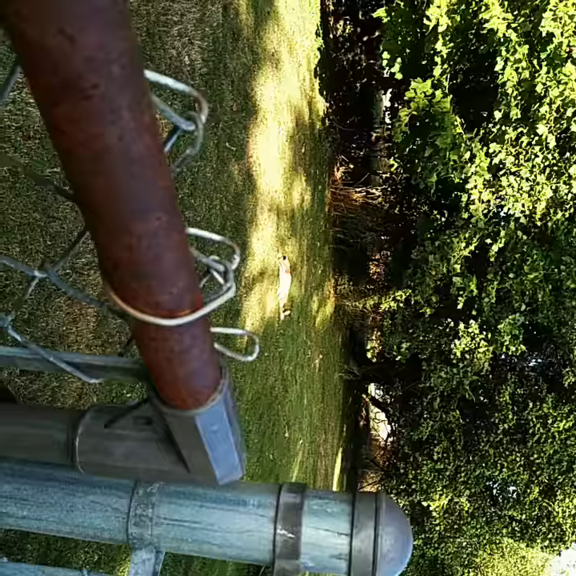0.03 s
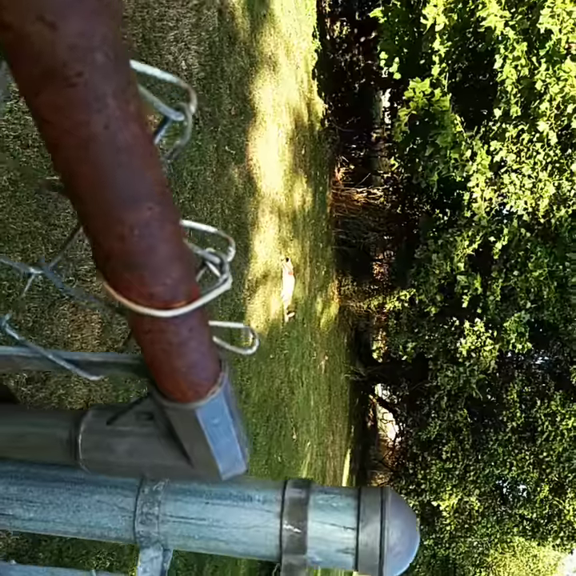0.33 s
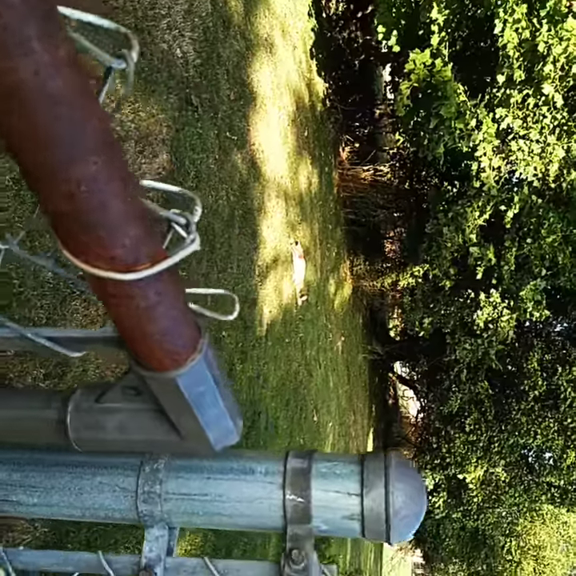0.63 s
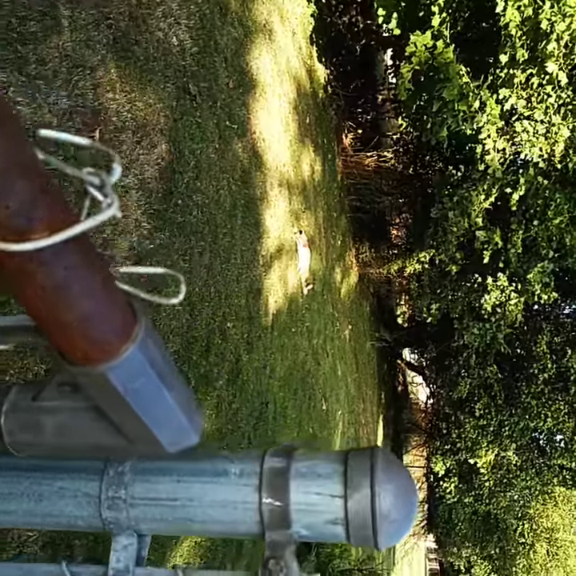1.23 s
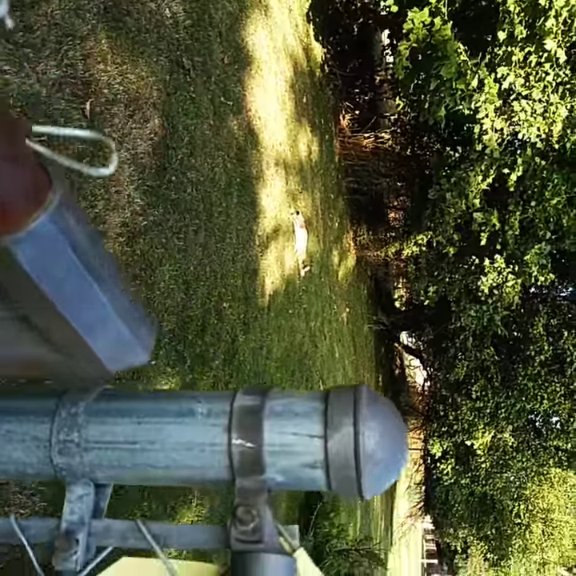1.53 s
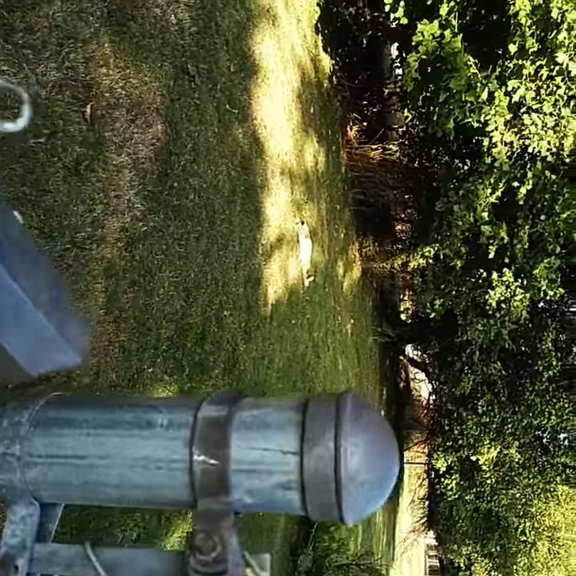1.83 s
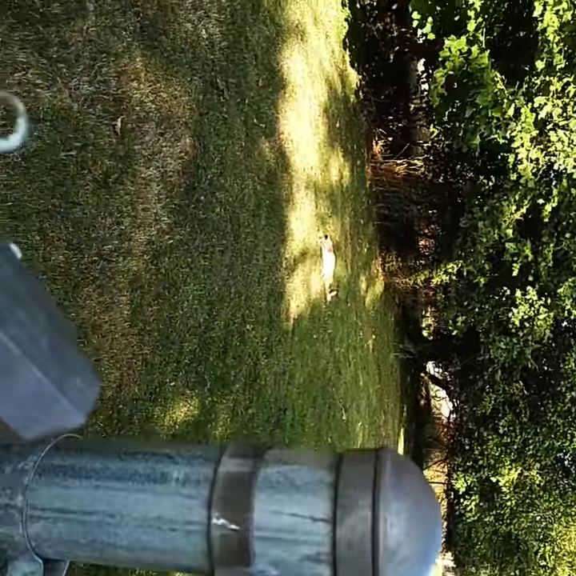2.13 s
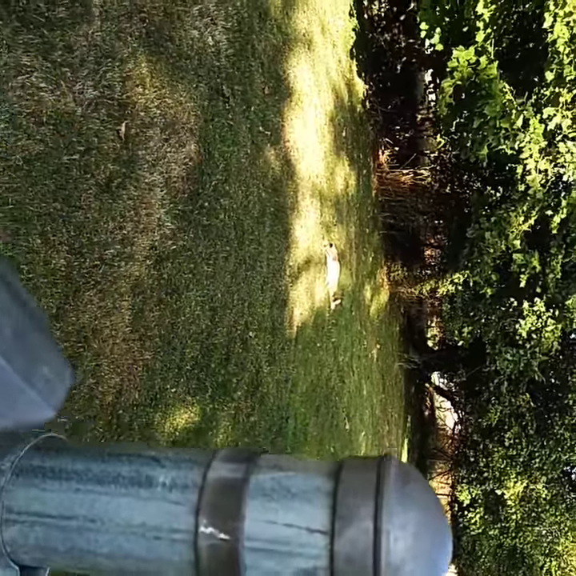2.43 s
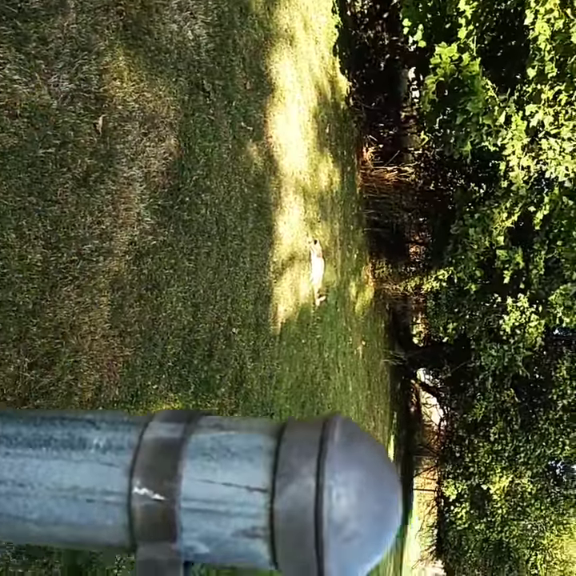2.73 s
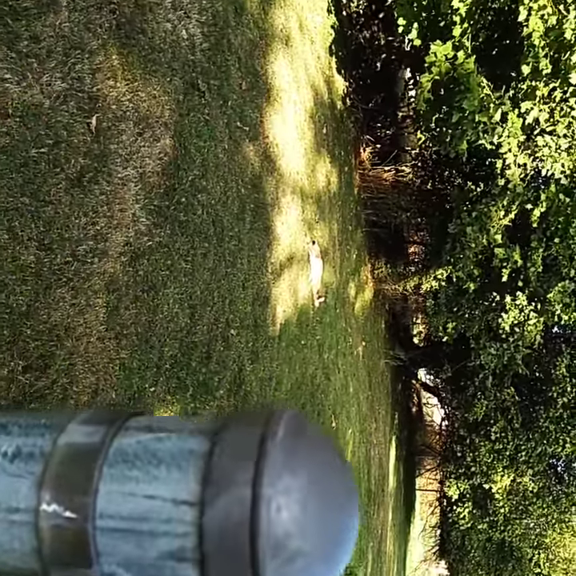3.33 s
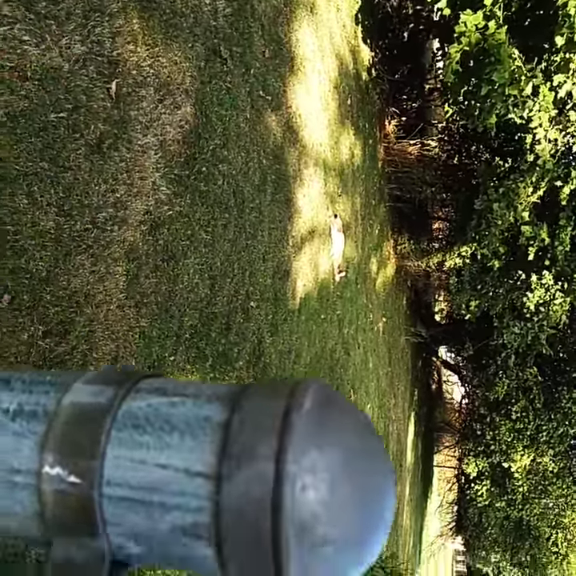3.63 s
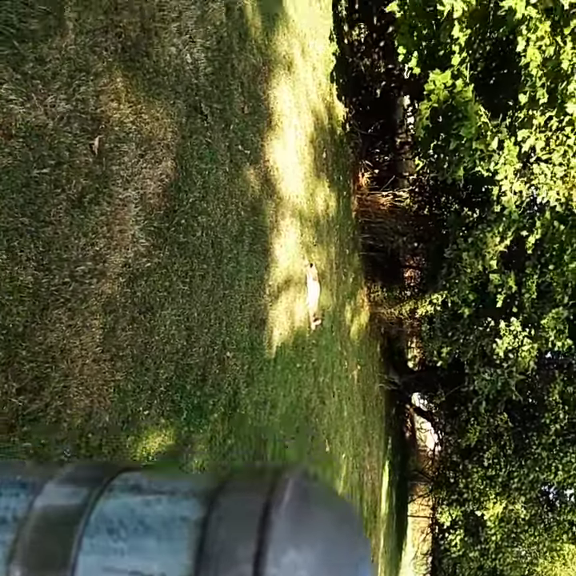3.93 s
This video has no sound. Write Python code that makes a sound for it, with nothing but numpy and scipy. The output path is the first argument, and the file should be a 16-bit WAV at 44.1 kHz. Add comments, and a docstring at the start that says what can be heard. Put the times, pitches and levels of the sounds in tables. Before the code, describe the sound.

Insects buzz and chirp steadily outdoors, with a few close knocks, snaps and rustles.

```python
"""Insects on a lawn beside trees

Bush crickets buzz in fast down-swept wing strokes and small crickets chirp over outdoor air
and a far chorus; a distant bird calls once. Handling knocks and bumps the hand-held microphone.
Dry snaps, ticks and a soft brushing come from close by. Mono."""
import sys
import numpy as np
from scipy import signal
from scipy.fft import rfft, irfft
from scipy.io import wavfile

SR = 44100
rng = np.random.default_rng(int(sys.argv[2]) if len(sys.argv) > 2 else 0)


def wrap_up_sound(samples):
    """Save the sound to the file named by the first command line argument, as 16-bit audio."""
    columns = np.atleast_2d(samples).T
    # keep every value between -1 and 1, then stretch to whole-number steps
    tamed = np.clip(columns, -1, 1)
    steps = np.round(tamed * 32767).astype(np.int16)
    wavfile.write(sys.argv[1], SR, steps)


N = 176400
TIME = np.arange(N) / SR


def from_db(db):
    """Decibels to gain."""
    return 10 ** (np.asarray(db) / 20)


def unit_rms(x):
    """Scale to unit power."""
    return x / np.sqrt(np.mean(x ** 2) + 1e-20)


def gain_curve(rows):
    """Gain along (s, dB) points."""
    return from_db(np.interp(TIME, *np.transpose(rows)))


def add(out, start_s, sound):
    """Mix a sound in at start_s."""
    i = int(np.clip(start_s * SR, 0, N))
    out[i:i + len(sound)] += sound[:N - i]


def wobble(hz):
    """Random movement up to about hz; rms 1."""
    lowpass = signal.butter(2, hz, fs=SR, output="sos")
    return unit_rms(signal.sosfilt(lowpass, rng.standard_normal(N + SR))[SR:])


def noise(spectrum, tilt_db=0):
    """Noise coloured by (Hz, dB) points and a tilt per octave; rms 1."""
    hz, db = np.transpose(spectrum)
    octave = np.log2(np.fft.rfftfreq(N, 1 / SR) + 1)
    low_cut_db = 20 * np.minimum(octave - np.log2(hz[0]), 0)
    colour_db = np.interp(octave, np.log2(hz), db + tilt_db * np.log2(hz)) + low_cut_db
    return unit_rms(irfft(rfft(rng.standard_normal(N)) * from_db(colour_db), N))


# Each row: frequency in Hz, relative density in dB.
AIR_SPECTRUM = [(25, -17), (50, 18.5), (80, 14), (130, 9.5), (200, 4.5), (350, 0.5), (700, -1), (1300, -4),
                (1750, -2.5), (2250, 1), (2800, -3.5), (3600, -5), (6200, -7), (7800, -7), (10500, -13.5),
                (16000, -15)]


def air():
    """Outdoor air and leaves: steady rumble and hiss."""
    return from_db(-42.5) * noise(AIR_SPECTRUM)


# Each row: pitch in Hz, width in Hz, level in dB, throbs per second.
CHORUS_BANDS = [(4650, 750, -54.5, 47), (5780, 80, -65, 27), (5600, 300, -65, 33), (7430, 450, -58.5, 57),
                (6850, 500, -62, 44), (8250, 700, -61.5, 70), (9300, 800, -63, 62), (11250, 400, -67, 52),
                (15400, 900, -62, 75)]


def far_chorus(throb_depth=.5):
    """Distant insects blur into throbbing bands, one for each kind."""
    out = np.zeros(N)
    for hz, width_hz, db, throb_hz in CHORUS_BANDS:
        phase = 2 * np.pi * hz * TIME
        band = wobble(width_hz / 2) * np.sin(phase) + wobble(width_hz / 2) * np.cos(phase)
        rate_hz = throb_hz * (1 + .0798 * wobble(7.8))
        throb = np.sin(2 * np.pi * np.cumsum(rate_hz) / SR)
        out += from_db(db) * unit_rms(band * (1 + throb_depth * throb))
    return out


def wing_stroke(length_s, hz, fall_hz):
    """A tone that swells, dies and falls as the scraper slows."""
    progress = np.linspace(0, 1, int(length_s * SR))
    cycles = np.cumsum(hz + fall_hz * (.5 - progress)) / SR + rng.random()
    return np.sin(np.pi * progress) * np.sin(2 * np.pi * cycles)


# Each row: start and end in seconds, strokes per second, stroke length in seconds, pitch in Hz,
# fall per stroke in Hz, relative level in dB.
TRILL_RUNS = [(.07, .62, 64.5, .011, 4830, 1000, -46.5), (.616, 1.6, 65.5, .011, 4900, 450, -48.5),
              (.641, .69, 59, .013, 4530, 300, -42), (.74, .9, 58.5, .012, 4540, 400, -46),
              (.928, 1.11, 58.8, .013, 4530, 400, -44), (1.148, 1.25, 59, .013, 4560, 400, -41.5),
              (1.268, 1.42, 60, .012, 4560, 400, -44.5), (1.44, 2.18, 58, .012, 4660, 850, -46.5),
              (2.2, 2.72, 50, .011, 4680, 1100, -46.5), (2.74, 3.17, 54, .013, 4900, 750, -47.5),
              (3.2, 4, 55.5, .012, 4680, 900, -49.5), (.1865, .53, 57, .012, 7400, 480, -40.5),
              (1.077, 1.175, 57, .011, 7480, 300, -45), (1.5, 2.2, 58, .011, 8550, 1100, -50.5),
              (2.2, 3, 52, .011, 8700, 1300, -50.5), (3.2, 4, 60, .012, 7800, 900, -54)]


def bush_crickets(jitter_s=.0004, spread_db=1.4, spread_hz=45, rasp_depth=.3):
    """Runs of quick, rasping wing strokes, each slightly different."""
    out = np.zeros(N)
    for start_s, end_s, rate_hz, length_s, hz, fall_hz, db in TRILL_RUNS:
        draws = rng.standard_normal((100, 3))
        for at_s, (late, strong, sharp) in zip(np.arange(start_s, end_s, 1 / rate_hz), draws):
            stroke = wing_stroke(length_s, hz + spread_hz * sharp, fall_hz)
            add(out, at_s + jitter_s * late, from_db(db + spread_db * strong) * stroke)
    return 1.52 * out * (1 + rasp_depth * wobble(520))


# Each row: delay in seconds, gain in dB.
ECHO_TAPS = [(.0045, -11), (0.024, -15), (.041, -18)]


def with_echoes(direct):
    """The direct sound plus reflections from ground and trees."""
    out = direct.copy()
    for delay_s, db in ECHO_TAPS:
        add(out, delay_s, from_db(db) * direct)
    return out


# Each row: start, period and chirp length in seconds, pitch in Hz, relative level in dB.
CRICKET_VOICES = [(.16, .0897, .038, 5612, -57), (.526, .2215, .044, 6062, -55.5),
                  (.4, .31, .05, 5785, -59)]


def crickets(spread_db=.75):
    """Pure one-stroke chirps, each insect keeping its own time."""
    out = np.zeros(N)
    for start_s, period_s, length_s, hz, db in CRICKET_VOICES:
        for at_s, weak in zip(np.arange(start_s, N / SR, period_s), rng.standard_normal(80)):
            add(out, at_s, from_db(db - spread_db * weak) * wing_stroke(length_s, hz, fall_hz=70))
    return 1.71 * out


# Each row: frequency in Hz, gain in dB, T60 in seconds.
HOUSING_MODES = [(72, 1, 0.054), (308, 6, 0.0064), (706, -0.5, 0.017), (1060, -6, 0.0085),
                 (2400, -5, 0.0045)]
# Each row: start in seconds, level in dB, gain of the lowest mode.
FINGER_KNOCKS = [(0.2471, -20, 0.82), (.2893, -28, .15)]


def knocks():
    """A finger knocks on the microphone housing, whose modes die quickly."""
    out, t = np.zeros(N), TIME[:SR // 10]
    for start_s, db, thud in FINGER_KNOCKS:
        for k, (hz, mode_db, t60_s) in enumerate(HOUSING_MODES):
            weight = (thud if k == 0 else 1) * (-1) ** (k + 1)
            envelope = from_db(db + mode_db - 60 * t / t60_s)
            add(out, start_s, weight * envelope * np.sin(2 * np.pi * hz * t))
    return out


def cracks(rows, spectrum, grain_db=1, tail_s=.06, tail_tilt_db=-1.5):
    """Grainy noise bursts with a short, duller outdoor tail."""
    out = np.zeros(N)
    for peak_s, db, attack_s, decay_s, tail_db, tilt_db in rows:
        before_s, after_s = np.maximum(peak_s - TIME, 0), np.maximum(TIME - peak_s, 0)
        grains = unit_rms(noise(spectrum, tilt_db) * from_db(-grain_db * wobble(1200)))
        burst = grains * np.exp(-after_s / decay_s)
        tail = from_db(tail_db) * noise(spectrum, tilt_db + tail_tilt_db) * np.exp(-after_s / tail_s)
        out += from_db(db) * np.exp(-before_s / attack_s) * (burst + tail)
    return out


# Each row: peak time in seconds, level in dB, attack and decay in seconds, tail gain in dB,
# tilt in dB per octave.
SNAP_EVENTS = [(.353, -36.5, 0.00061, 0.0028, -16, -2.5), (3.141, -36, .002, 0.0036, -14, -5),
               (3.177, -26, 0.0032, 0.011, -8, -2.7), (3.361, -41, .003, 0.006, -1.5, 3),
               (3.84, -38, 0.0012, 0.0049, -13, -8), (3.9543, -24.5, 0.000042, 0.0037, -17, -0.3)]
# Each row: frequency in Hz, relative density in dB.
SNAP_SPECTRUM = [(300, -26), (1200, -8), (2200, 4), (3300, 0.5), (4300, -1), (6300, -4.5), (10500, -5.5),
                 (12500, -19), (16000, -32)]


def snaps():
    """Dry, close cracks with little bass."""
    return cracks(SNAP_EVENTS, SNAP_SPECTRUM)


# Each row: peak time in seconds, level in dB, pitch in Hz, length in seconds.
HANDLING_BUMPS = [(1.116, -27, 68, 0.037), (1.318, -27, 77, 0.048), (1.361, -30, 53.5, .08),
                  (1.559, -30, 62, 0.027), (1.712, -35.5, 70, 0.13), (1.755, -20.5, 110, 0.0091),
                  (1.994, -33.5, 60, 0.066), (2.06, -38.5, 72, 0.086), (2.125, -34, 80, 0.017),
                  (2.254, -35.5, 53.6, 0.061), (2.432, -37, 56, 0.062), (2.853, -36.5, 128, 0.017),
                  (2.924, -35.5, 58.6, 0.039), (3.621, -26.5, 66.4, 0.027), (3.67, -33.5, 117, 0.021),
                  (3.748, -31.5, 60, 0.057)]


def bumps(grit_gain=.32):
    """Each bump rocks the microphone for a few low cycles."""
    out = np.zeros(N)
    grit = noise([(50, 5.5), (150, -1), (230, -14), (400, -42.5), (1500, -78)])
    for peak_s, db, hz, length_s in HANDLING_BUMPS:
        t = TIME - peak_s
        envelope = from_db(db) * np.exp(-(2 * t / length_s) ** 2)
        out += envelope * (np.sin(2 * np.pi * hz * t) + grit_gain * grit)
    return out


# Peak time and length in seconds, pitch and width in Hz.
BIRD_NOTE = (1.56, .085, 2170, 180)


def far_bird():
    """A short hoarse note, blurred by distance."""
    peak_s, length_s, hz, width_hz = BIRD_NOTE
    envelope = from_db(-45.5) * np.exp(-(2 * (TIME - peak_s) / length_s) ** 2)
    return envelope * wobble(width_hz / 2) * np.sin(2 * np.pi * hz * TIME)


# Each row: time in seconds, level in dB.
BRUSH_CURVE = [(0, -73), (2.45, -53), (2.56, -62), (2.74, -58), (2.83, -45), (2.97, -41.5), (3.15, -45.5),
               (3.35, -56), (3.48, -62), (3.62, -50), (3.72, -72), (4, -71)]
RUSTLE_CURVE = [(0, -71), (3.05, -57), (3.15, -44.5), (3.25, -54), (3.44, -48), (3.55, -48.5),
                (3.72, -52.5), (4, -59)]
# Each row: frequency in Hz, relative density in dB.
BRUSH_SPECTRUM = [(3000, -10), (6500, -4), (9500, -1.5), (12500, -8), (15500, -1.5)]
RUSTLE_SPECTRUM = [(300, -22), (800, -9.5), (1600, -5.5), (2900, -3.5), (4500, -38), (9000, -73)]


def brushing(flicker_db=2):
    """A treble brush and a midrange rustle swell and flicker."""
    brush = gain_curve(BRUSH_CURVE) * noise(BRUSH_SPECTRUM)
    rustle = gain_curve(RUSTLE_CURVE) * noise(RUSTLE_SPECTRUM)
    return (brush + rustle) * from_db(flicker_db * wobble(40))


# Columns as in SNAP_EVENTS and SNAP_SPECTRUM.
TICK_EVENTS = [(2.5288, -31, 0.0005, 0.01, -13.5, 0.5), (3.257, -37, .001, .005, -13, 0),
               (3.338, -36, 0.0018, 0.009, -13, 2), (3.544, -35.5, .0005, 0.0056, -12, -2),
               (3.586, -43, .002, .009, -13, -3), (3.647, -36.5, 0.0013, .008, -18, 0),
               (3.874, -39, 0.00026, .001, -20, -6)]
TICK_SPECTRUM = [(600, -3), (2500, 0), (8000, 2.5), (11000, 2.5), (15500, 1.5)]


def ticks():
    """Crisp ticks, as of dry leaves."""
    return cracks(TICK_EVENTS, TICK_SPECTRUM)


def scene():
    """Insects, air and bird under the small close sounds; both channels alike."""
    lawn = with_echoes(bush_crickets() + crickets()) + far_chorus() + air()
    close = brushing() + bumps() + knocks() + snaps() + ticks()
    return np.tile(lawn + far_bird() + close, (2, 1))


# Each row: time in seconds, gain in dB.
FADE_IN_CURVE = [(0, -62), (.055, -85), (.068, -22.5), (.11, -9.5), (.2, -4.5), (.3, -2), (.45, -1.5)]
CUTOFF_HZ = 15800


def record(dry):
    """Quick fade-in, then a steep low-pass."""
    lowpass = signal.ellip(12, .1, 70, CUTOFF_HZ, fs=SR, output="sos")
    return signal.sosfilt(lowpass, dry * gain_curve(FADE_IN_CURVE))


dry = scene()
out = record(dry)
wrap_up_sound(out)
```